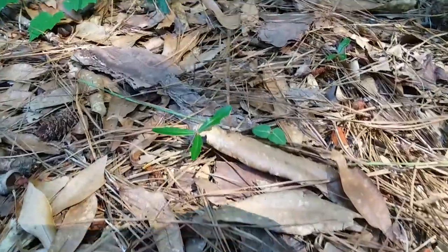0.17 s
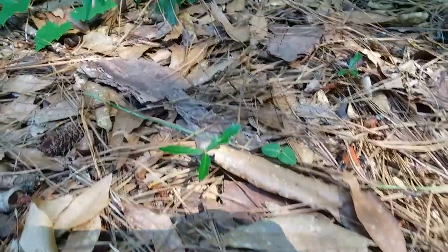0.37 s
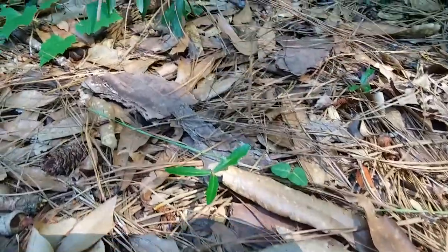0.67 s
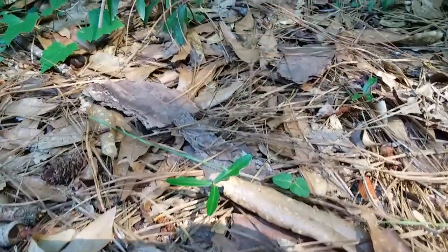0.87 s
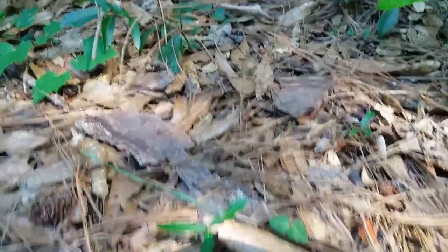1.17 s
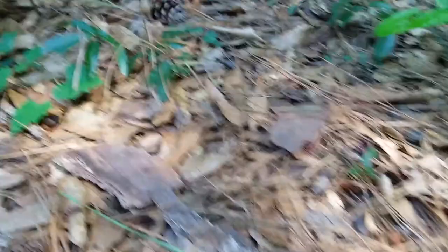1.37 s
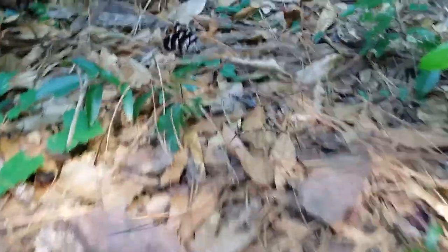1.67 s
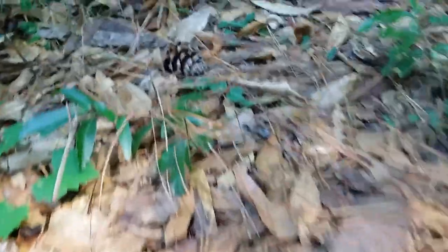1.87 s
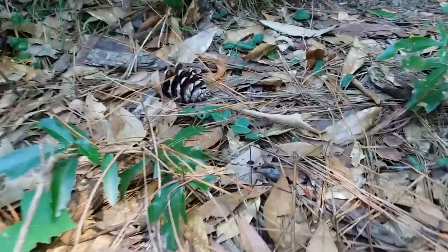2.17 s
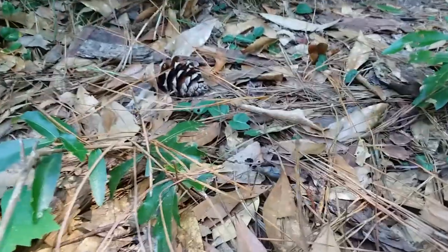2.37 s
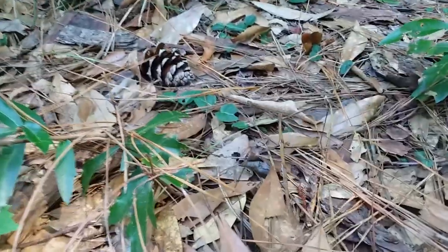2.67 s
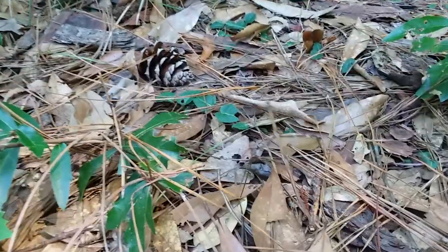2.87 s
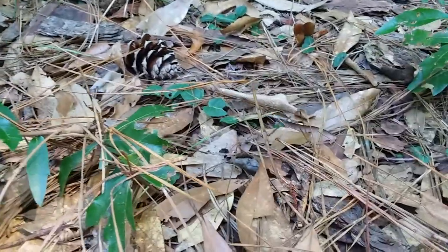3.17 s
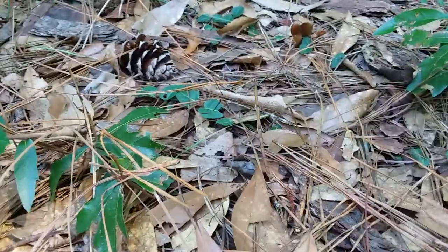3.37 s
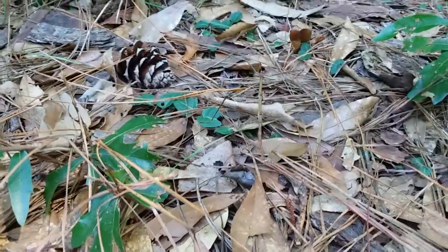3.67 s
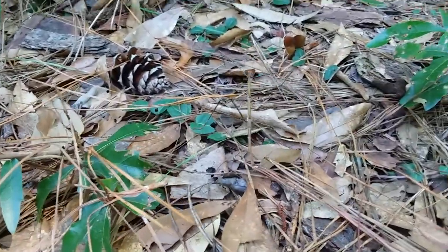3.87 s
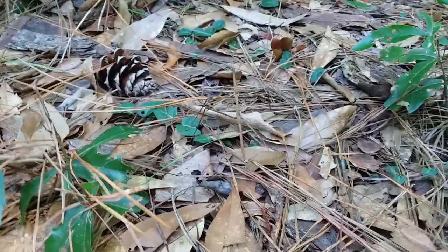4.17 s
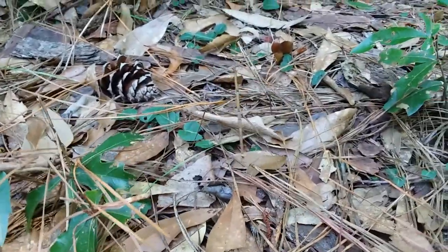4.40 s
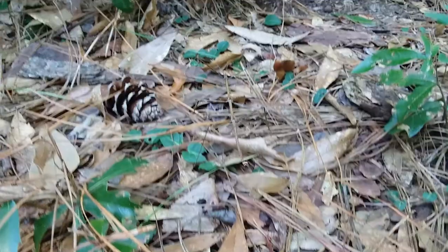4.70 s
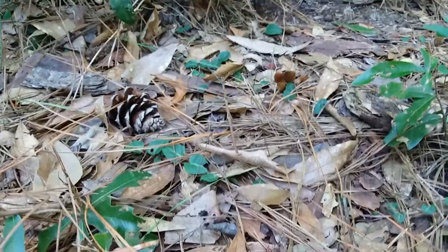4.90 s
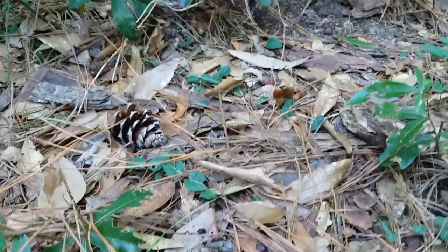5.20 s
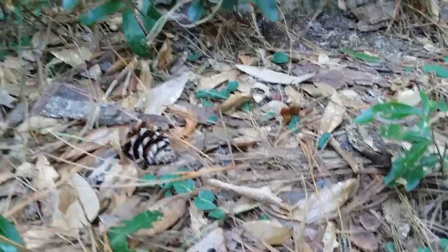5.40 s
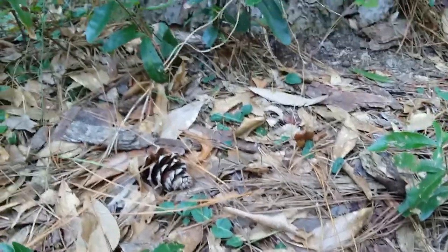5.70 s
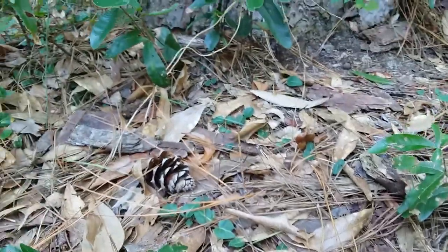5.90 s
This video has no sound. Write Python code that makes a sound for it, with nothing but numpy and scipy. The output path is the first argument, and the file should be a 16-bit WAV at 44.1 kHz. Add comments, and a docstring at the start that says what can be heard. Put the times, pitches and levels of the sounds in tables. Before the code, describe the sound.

A cicada buzzes in a pine wood, a knock bumps the microphone, twigs and dry leaves crack, then the song swells, slows and dies away.

```python
"""A cicada is already buzzing softly in a pine wood, over far insects and a low distant rumble.
A small bird chips once, the hand-held camera is bumped beside its left microphone, and twigs and dry leaves crack.
The song swells, its throb slows, and it dies away. It is built from overtones, rasping noise and short rings.
The backgrounds are shaped noise, the bird is a gliding tone, and the knocks and cracks are rings of struck bodies."""
import sys
import numpy as np
from scipy import signal
from scipy.fft import rfft, irfft
from scipy.io import wavfile

SR = 44100
rng = np.random.default_rng(int(sys.argv[2]) if len(sys.argv) > 2 else 0)


def unload_audio(sound):
    """Save the sound as a 16-bit wav file, at the path given as the first command line argument."""
    columns = np.transpose(np.atleast_2d(sound))
    # keep every value between -1 and 1, then stretch to whole-number steps
    steps = np.round(np.clip(columns, -1, 1) * 32767)
    wavfile.write(sys.argv[1], SR, steps.astype(np.int16))


N = 266628
T = np.arange(N) / SR  # time of each sample (s)
HZ = np.fft.rfftfreq(N, 1 / SR)  # pitch of each spectrum bin

RIGHT_LEAD_S = 1.75 / SR  # the wood's sound reaches the right microphone first
CYCLE_HZ, CYCLE_RISE_HZ_PER_S = 248.76, .603  # the tymbal cycle creeps up through the song
GROUND_SHARE = .66  # strength of the ground's echo against the direct sound
SMEAR_RAD = .7  # typical random phase shift that smears a pulse
# delay of the ground's echo, which changes as the camera moves: time_s, delay_s
GROUND_DELAY = [(0, .002073), (1.5, .0021), (1.75, .002122), (2.5, .00212), (4.7, .00216)]
# leaves scatter the treble, so it differs between the microphones: pitch_hz, share_0_to_1
SCATTER = [(8700, .2), (10400, .9)]


def amp(db):
    """Turns decibels into gain."""
    return 10 ** (np.asarray(db) / 20)


def unit(x):
    """Scales a sound to an rms of 1."""
    return x / np.sqrt(np.mean(abs(x) ** 2) + 1e-20)


def curve(rows):
    """Reads a table of times and values at every sample."""
    return np.interp(T, *np.transpose(rows))


def read(points, hz):
    """Reads a table of pitches and values, on a logarithmic pitch axis."""
    f, value = np.transpose(points)
    return np.interp(np.log(hz + 1), np.log(f + 1), value)


def pan(left_db):
    """Gives the two channels' gains for a left-minus-right level."""
    return amp([[left_db / 2], [-left_db / 2]])


def add(mix, s, sound):
    """Mixes a stereo sound in at time s."""
    part = mix[:, round(s * SR):][:, :sound.shape[1]]
    part += sound[:, :part.shape[1]]


def wander(rate_hz):
    """Slow random drift with an rms of 1."""
    return unit(irfft(rfft(rng.standard_normal(N)) * np.exp(-(HZ / rate_hz) ** 2), N))


def colour(x, spectrum):
    """Filters a sound by a spectrum table, to an rms of 1."""
    return unit(irfft(rfft(x) * amp(read(spectrum, HZ)), N))


def air(spectrum):
    """Noise from all around: alike at both microphones in the bass, different in the treble."""
    # left-right likeness: pitch_hz, likeness_0_to_1
    likeness = [(60, 0.87), (130, 0.95), (290, 0.72), (640, 0.64), (1400, 0), (4000, 0), (15000, 0)]
    a, b = rfft(rng.standard_normal((2, N)))
    same = np.clip(read(likeness, HZ), 0, 1)
    right = same * a + np.sqrt(1 - same ** 2) * b
    right = right * np.exp(2j * np.pi * HZ * RIGHT_LEAD_S)
    return unit(irfft(np.array([a, right]) * amp(read(spectrum, HZ)), N))


def strike(spectrum, tilt_db, slow=0., size=2048):
    """The ring of a body after one sharp blow, peak 1; in a bending shell the low notes arrive later."""
    hz = abs(np.fft.fftfreq(size, 1 / SR))
    log_gain = np.log(amp(read(spectrum, hz) + tilt_db * np.log2(hz / 1000 + 1 / 2)))
    # this phase puts the ring after the blow, never before it
    response = np.exp(np.conj(signal.hilbert(log_gain)) - 1j * abs(slow) * np.sqrt(hz / 1000))
    ring = irfft(response[:size // 2 + 1])[:size // 2]
    return ring / abs(ring).max()


def stroke(start, hold_s, db, fade_db_per_s, rise_s):
    """A loudness shape that rises up to its start, holds and fades."""
    rise = np.clip(1 + (T - start) / rise_s, 0, 1)
    return rise * amp(db - abs(fade_db_per_s) * np.maximum(T - start - hold_s, 0))


def trunks(x, t60, count=160):
    """Scattered echoes off the trees, different on each side, falling 60 dB in t60 seconds."""
    taps = np.zeros((2, SR // 2))
    at = rng.integers(0, SR // 2, (2, count))
    np.put_along_axis(taps, at, rng.choice([-1., 1.], (2, count)), 1)
    taps *= 1000 ** (-np.arange(SR // 2) / SR / t60)
    taps /= np.linalg.norm(taps, axis=1, keepdims=True)
    return signal.fftconvolve(x, taps, axes=1)[:, :N]


def background(rumble_db=-58, insects_db=-69, hum_hz=113.0, hum_db=-70):
    """Shaped noise for distant traffic and far insects, with a faint hum that wavers in pitch and level."""
    # spectra of the noises: pitch_hz, relative_db_per_hz
    rumble_spectrum = [(20, -61), (35, -31), (58, -1.5), (85, -3.5), (113, 1.5), (145, -5.5), (250, -10.5),
                       (430, -14.5), (700, -22.5), (1100, -24.5), (1900, -32.5), (4000, -27), (16000, -52)]
    insect_spectrum = [(1200, -11), (2300, -14), (3200, -18), (3900, -26), (5000, -0.5), (5700, -0.5),
                       (6300, 0), (8300, -2.5), (9600, -10.5), (11300, -1), (13000, -13), (16000, -20)]
    road_spectrum = [(200, -28), (500, -5.5), (780, 5.5), (1000, 1.5), (1350, -14.5), (2500, -20)]
    low_hiss_spectrum = [(1200, -20), (2200, 1), (3200, -0.5), (3800, -0.5), (4600, -17), (8000, -48)]
    # level of a soft low hiss, which sinks in the middle and rises a little at the end: time_s, level_db
    low_hiss_level = [(0, -73), (1.1, -70), (2.3, -75), (3.2, -81), (4.6, -82.5), (5.2, -78)]
    nearest_s, pass_s, nearest_db = 5.66, 0.55, -64  # a far vehicle draws near

    rumble = air(rumble_spectrum) * amp(rumble_db + .7 * wander(3.5)) * pan(0.95)
    hum_phase = 2 * np.pi * np.cumsum(hum_hz + 3 * wander(7.7)) / SR
    hum = unit(np.sin(hum_phase) * (1 + .5 * wander(9.2)))
    insects = air(insect_spectrum) * amp(insects_db + .5 * wander(22.0))
    low_hiss = air(low_hiss_spectrum) * amp(curve(low_hiss_level))
    vehicle = air(road_spectrum) * amp(nearest_db) / np.hypot(1, (T - nearest_s) / pass_s)
    return rumble + amp(hum_db) * hum + vehicle + insects + low_hiss


def far_trills(pulse_hz=45, pulse_depth=0.36, drift_db=2.0):
    """Single insects deep in the wood, each a narrow band of noise that pulses and drifts in level."""
    # the insects: pitch_hz, width_hz, average_level_db
    trills = [(5680, 200, -78), (6470, 110, -83), (7760, 220, -82), (8180, 200, -81.5), (11330, 250, -87)]
    out = np.zeros((2, N))
    for hz, width_hz, db in trills:
        ring = irfft(rfft(rng.standard_normal((2, N))) / (1 + (2 * (HZ - hz) / width_hz) ** 2), N)
        own_pulse_hz = pulse_hz * rng.uniform(.7, 1.3)
        pulses = 1 + pulse_depth * np.sin(2 * np.pi * own_pulse_hz * T)
        out += amp(db + drift_db * wander(2)) * unit(ring * pulses)
    return out


def footing(settle_s=0.01, size=4096):
    """A shoe presses the soft ground: a dull thud, then the needles settle as fading noise."""
    # the thuds: start_s, peak_db (before panning), treble_tilt_db_per_octave, left_minus_right_db
    thuds = [(3.864, -50, -7.5, -11), (4.12, -49, 4, 9)]
    # ring of the soil: pitch_hz, relative_db
    soil = [(80, -17), (400, 7), (900, -8), (2000, -16), (4000, -37), (16000, -60)]
    out = np.zeros((2, N))
    for s, db, tilt_db, left_db in thuds:
        push = 0.17 * rng.standard_normal((2, size)) * np.exp(-np.arange(size) / SR / settle_s)
        push[:, 0] = 3  # the first press is the strongest
        thud = signal.fftconvolve(push, strike(soil, tilt_db)[None], axes=1)
        add(out, s, amp(db) * thud / abs(thud).max() * pan(left_db))
    return out


def crackle(grains_per_s=5000, count=24, left_db=-1.5):
    """A foot shifts in the leaves: tiny breaks, each a few cycles at one of several pitches."""
    # the shifts: start_s, hold_s, level_db (before panning)
    rustles = [(0, 1.8, -73.5), (1.295, 0.056, -63.5), (1.478, 0.12, -57.5), (1.626, 0.14, -61),
               (1.96, 0.67, -69.5), (5.68, 0.072, -73)]
    rise_s, fade_db_per_s = 0.16, 78
    # tone of the leaves: pitch_hz, relative_db
    leaf_tone = [(200, 3.5), (700, 1.5), (1500, -2), (2400, -4.5), (4000, -7.5), (8000, -5), (16000, -14)]
    t, out = np.arange(200) / SR, np.zeros((2, N))
    for hz in np.geomspace(800, 15000, count):
        at = rng.integers(0, N, round(grains_per_s * N / SR / count))
        strength = amp(3 * np.minimum(rng.exponential(1, len(at)), 4))
        breaks = np.zeros((2, N))
        breaks[:, at] = strength * rng.uniform(.3, 1, (2, len(at)))
        grain = hz * np.sin(2 * np.pi * hz * t) * np.exp(-hz * t / 2)
        out += signal.oaconvolve(breaks, grain[None], axes=1)[:, :N]
    pressure = np.max([stroke(*row, fade_db_per_s, rise_s) for row in rustles], axis=0)
    return colour(out, leaf_tone) * pressure * pan(left_db)


def litter(splinter_s=0.0023, echo_db=-26, size=1024):
    """A twig rings briefly when it snaps; a dry leaf splinters in a few milliseconds of tiny breaks."""
    # the cracks: start_s, level_db (before panning), leaf_treble_tilt_db_per_octave, wood_share_0_to_1
    cracks = [(1.4305, -34.5, -3, 0.08), (1.459, -39, -4, 0.4), (1.471, -43, 0, 0.5),
              (1.4914, -26, 8, 0.52), (1.507, -38, 0, 0.65), (1.5255, -34, 5, 0.13), (1.533, -42, -10, 0.4),
              (1.547, -40, -6, 0.4), (1.5765, -29.5, -7.5, 0.1), (1.594, -25.5, 1.5, 0.13),
              (1.605, -41, -8, 0.3), (1.661, -36.5, -8.5, 0.24), (1.6864, -14, -5.5, 0.76),
              (1.752, -41, -1, 0.05), (1.816, -39, 6, 0.04), (2.036, -42, -6, 0.06), (2.142, -38, 2, 0),
              (2.339, -44, -8.5, 0.1), (2.663, -38, 3, 0.05), (3.123, -49, -3, 0.45),
              (5.3378, -29.5, -1.5, 0.08), (5.368, -39.5, 4, 0.13), (5.596, -46.5, 0, 0), (5.68, -45, 3, 0)]
    # rings of the two materials: pitch_hz, relative_db
    twig = [(100, -16), (700, -23), (1100, -6), (1520, 2), (1980, -10.5), (2330, 7.5), (2950, 2),
            (3900, -12.5), (5500, -25), (7000, -21), (8400, -21), (10500, -23), (13500, -21), (15000, -7.5),
            (16500, -23)]
    dry_leaf = [(300, -28), (1500, -16), (2400, -15), (3400, -3), (4400, -9), (5700, 3), (7200, -3),
                (8100, -1), (9500, -8), (11500, -1), (13500, -2), (16500, -4)]
    out = np.zeros((2, N))
    for s, db, tilt_db, wood in cracks:
        breaks = rng.standard_normal((3, size)) * np.exp(-np.arange(size) / SR / splinter_s)
        breaks[0, 0] = 7  # a sharp first break, shared by both sides
        both_sides = breaks[0] + 5.6 * breaks[1:]
        leaf = signal.fftconvolve(both_sides, strike(dry_leaf, tilt_db)[None], axes=1)[:, :size]
        wood = np.clip(wood, 0, 1)
        snap = wood * strike(twig, 0, slow=3.6) + (1 - wood) * leaf / abs(leaf).max()
        add(out, s, amp(db) * snap * pan(-2.8))
    return out + crackle() + amp(echo_db) * trunks(out, t60=0.53)


def handling(far_side_db=-19, slow=2.5):
    """A finger knocks the case, which rings, and slides across it as noise, beside the left microphone."""
    # the knocks: start_s, peak_db (left side), treble_tilt_db_per_octave
    bumps = [(1.1874, -6.5, 0), (1.2481, -14.5, 3), (1.254, -24.5, 3), (1.2566, -32, -9),
             (1.2593, -11.5, 3), (1.261, -18.5, 4), (1.266, -42, -4), (1.267, -18, 14)]
    # the slides: start_s, hold_s, level_db (left side), fade_db_per_s
    slides = [(1.193, .003, -44, 290), (1.257, .011, -32, 2100)]
    # ring of the case, and tone of a finger sliding on it: pitch_hz, relative_db
    case = [(40, -45), (120, -10), (250, 5.5), (480, 1.5), (800, -2.5), (1250, -7.5), (1750, -2.5),
            (2400, -19), (4200, -21.5), (5500, -26), (8000, -23), (10000, -40), (16000, -41)]
    scrape_tone = [(100, -40), (290, -9), (470, 8.5), (720, -3), (1000, -4), (2200, -3), (3100, -15),
                   (8000, -22.5), (16000, -35)]
    out = np.zeros((2, N))
    for s, db, tilt_db in bumps:
        near = strike(case, tilt_db, slow)
        far = strike(case, tilt_db - 6.5, 3 * slow)  # duller and more spread out
        add(out, s, amp(db) * np.array([near, amp(far_side_db) * far]))
    scrape = colour(rng.standard_normal((2, N)), scrape_tone)
    scrape = scrape * sum(stroke(*row, rise_s=0.013) for row in slides)
    return out + scrape * amp([[0], [far_side_db]])


def bird(echo_db=0):
    """One thin chip, a tone that falls quickly and levels off, and its echoes."""
    start_s, length_s, from_hz, to_hz, level_db = .936, .042, 8300, 7450, -56
    u = np.clip((T - start_s) / length_s, 0, 1)  # progress through the chip
    hz = to_hz + (from_hz - to_hz) * (1 - u) ** 2
    chip = np.sin(2 * np.pi * np.cumsum(hz) / SR) * np.sin(np.pi * u) * amp(level_db) * pan(0)
    return chip + amp(echo_db) * trunks(chip, t60=0.74)


def ground(x, share):
    """Adds the ground's echo, which cuts a sound into slowly shifting bands."""
    echo = np.array([np.interp(T - curve(GROUND_DELAY), T, side) for side in x])
    return (x + share * echo) / np.hypot(1, share)


def tymbal_lines(cycle, opening):
    """The overtones of the rib clicks; the ground's echo strengthens some and cancels others."""
    # the overtones: multiple_of_cycle, relative_db
    overtones = [(13, -22), (14, -26), (15, -9), (16, -15), (17, -10.5), (18, -12), (19, -6), (20, -10),
                 (21, -15), (22, -7), (23, -11), (24, -3), (25, -.5), (26, .5), (27, -6), (28, 1), (29, -5),
                 (30, .5), (31, -1.5), (32, 0), (33, -8), (34, -8.5), (35, -18), (36, -17)]
    # levels of the overtones above those: pitch_hz, relative_db
    skirt = [(9200, -30), (9800, -30), (10600, -16), (11300, -14.5), (12300, -18), (14000, -21),
             (16000, -26)]
    # the abdomen's resonance shifts up and down through the song and sinks as it ends:
    # time_s, centre_hz, boost_db
    abdomen = [(0, 6400, 2), (1.4, 6400, 2), (2.1, 6700, 2), (2.6, 7900, 2), (2.9, 6800, -1),
               (3.22, 6450, 3), (3.6, 6300, 2), (3.85, 7050, 1), (4.2, 7150, 2), (4.6, 7200, -2.5),
               (5, 6050, 5)]
    abdomen_width_hz = 400
    # extra level of the overtones below low_hz: time_s, level_db
    low_level = [(0, 1), (2.2, 2), (3.3, -2), (4.3, -3), (4.8, -8)]
    low_hz = 4100
    # the quiet opening lacks treble: pitch_hz, level_db
    opening_dull = [(8500, 0), (10500, -9)]

    echo_lag = 2 * np.pi * (CYCLE_HZ + CYCLE_RISE_HZ_PER_S * T.mean()) * curve(GROUND_DELAY)
    levels = [(k, amp(db)) for k, db in overtones]
    levels += [(k, amp(read(skirt, k * CYCLE_HZ))) for k in range(overtones[-1][0] + 1, 64)]
    times, *controls = np.transpose(abdomen)
    centre_hz, boost_db = (np.interp(T, times, c) for c in controls)
    low_db = curve(low_level)
    ribs, power = np.zeros((2, N), complex), np.zeros(N)
    for k, level in levels:
        hz = k * CYCLE_HZ
        ring_db = boost_db * np.exp(-((hz - centre_hz) / abdomen_width_hz) ** 2)
        # each overtone slowly swells and sinks at its own rate
        flutter_hz = .8 * rng.uniform(0.4, 1.96)
        ring_db += 1.2 * np.sin(2 * np.pi * (flutter_hz * T + rng.random()))
        ring_db += (hz < low_hz) * low_db
        ring_db += opening * read(opening_dull, hz)
        heard = level * amp(ring_db) * (1 + GROUND_SHARE * np.exp(-1j * k * echo_lag))
        # the two tymbals are equally loud but ring differently; paths of unequal length smear each pulse
        lag = np.pi / 2 * (k % 2) + SMEAR_RAD * rng.standard_normal()
        lag = lag + np.array([0, 2 * np.pi * hz * RIGHT_LEAD_S])
        lag[1] += 2 * read(SCATTER, hz) ** 2 * rng.standard_normal()
        ribs += np.exp(1j * lag)[:, None] * (heard * np.exp(1j * k * cycle))
        power += abs(heard) ** 2
    return ribs / np.sqrt(power)  # an even level throughout


def falling_rings(cycle, beat, cycle_hz, throb_hz):
    """Each rib click rings for under a millisecond; the clicks of a squeeze swell, fade and fall in pitch."""
    # the rings: from_hz, to_hz, ring_time_s, relative_db, share_left_between_throbs
    rings = [(7000, 4400, .0003, -8, .1), (8800, 7400, .0003, -16, .9), (12600, 10000, .00012, -14, .85)]
    # the body passes little of the rings' low end: pitch_hz, level_db
    ring_reach = [(3000, -30), (4100, -16), (4750, 0), (16000, 0)]
    # a squeeze starts this far before the throb's top and lasts this long (in throbs)
    squeeze_lead, squeeze_share = .36, .68
    out = np.zeros(N)
    for from_hz, to_hz, ring_s, db, rest in rings:
        train = np.zeros(N)
        for earlier in (0, 1):  # the last click and the one before it
            age = (cycle / np.pi % 1 + earlier) / (2 * cycle_hz)  # seconds since the click
            throbs = beat / (2 * np.pi) - throb_hz * age + squeeze_lead
            squeeze = np.minimum(throbs % 1 / squeeze_share, 1)
            hz = np.where(squeeze < 1, from_hz + (to_hz - from_hz) * squeeze, (from_hz + to_hz) / 2)
            strength = rest + (1 - rest) * np.sin(np.pi * squeeze)
            train += strength * age * np.exp(-age / ring_s) * np.sin(2 * np.pi * hz * age)
        out += amp(db) * unit(train)
    # paths of unequal length smear each click, a little differently for each microphone
    knots = np.arange(0, SR / 2, 420)  # a new random phase every 420 Hz
    shared, own = (np.interp(HZ, knots, row) for row in rng.standard_normal((2, len(knots))))
    right = 2 * np.pi * HZ * RIGHT_LEAD_S + 2 * read(SCATTER, HZ) * own
    lag = SMEAR_RAD * shared + np.array([0 * right, right])
    smeared = irfft(rfft(out) * amp(read(ring_reach, HZ)) * np.exp(1j * lag), N)
    return ground(smeared, .45)


def swell_bands(song):
    """Raises and lowers each band of the song along its own level curve."""
    # the bands: centre_hz, half_width_hz, level curve (time_s, level_db)
    bands = [(5040, 340, [(0, -7), (.3, -6), (.5, 0), (2.2, -1.5), (2.6, -1), (3.3, -1.5), (3.9, 1.5),
             (4.3, -2), (4.8, -3)]), (7080, 190, [(0, 0), (1, 0), (1.2, -1), (1.9, 0), (2.3, -3.5),
             (2.9, -4), (3.2, 2.5), (3.6, 0), (4.2, 2), (4.9, 0)]), (8360, 370, [(0, 4), (.3, 0.5),
             (1.8, 2), (2.1, 1), (2.9, 2.5), (3.6, -1.5), (4.6, 0)])]
    for centre_hz, width_hz, level in bands:
        band = irfft(rfft(song) * np.exp(-((HZ - centre_hz) / width_hz) ** 2), N)
        song = song + (amp(curve(level)) - 1) * band
    return song


def cicada(level_db=3.0, echo_db=-15, left_db=-4.0, start_left_db=1, rasp_rise_db=6):
    """Buckling tymbal ribs give a train of pulses, which the abdomen squeezes into throbs."""
    # the song's loudness, before level_db is added: time_s, level_db
    effort = [(0, -61.5), (1.14, -61.5), (1.8, -58.5), (2.02, -56.5), (2.18, -59), (2.4, -57),
              (2.95, -57.5), (3.22, -54.5), (3.65, -55.5), (3.73, -58.5), (4.02, -56), (4.22, -58.5),
              (4.54, -58), (4.9, -64), (5.2, -84)]
    stop_s, stop_db_per_s = 5.1, 60  # then the song dies away
    # the throb is fastest early on, then slows more and more: time_s, rate_hz (before a slight wander)
    throb_rate = [(0, 97.7), (.7, 98.7), (2.2, 96.8), (3.1, 92.7), (3.7, 88), (4.2, 82.8), (4.9, 75.7)]
    # the throb flattens as the song ends: time_s, share_of_depth
    throb_fade = [(4.45, 1), (5, .35)]
    # how strongly each pitch throbs: pitch_hz, relative_depth
    throb_reach = [(3700, .9), (4900, 1.1), (5600, 1), (6050, .6), (6650, .55), (7000, 1.05), (7300, .9),
                   (7700, .25), (16000, .15)]
    # spectrum of the rasp: pitch_hz, relative_db_per_hz
    rasp_spectrum = [(2500, -40), (3450, -26), (3780, -7), (4200, -16), (5000, -2), (5600, -2.5),
                     (6600, -3), (7300, -5), (7700, -3), (8300, -3), (8850, -7), (9800, -11), (11200, -2),
                     (13000, -9), (16000, -14)]
    start_rasp_db = -16  # against the overtones
    # the rings grow as the song builds: time_s, level_db
    ring_level = [(0, -12.5), (1.1, -6.5), (2, -1.5), (2.6, 2.5), (3.3, 1), (4.4, 2)]
    whistle_hz, whistle_width_hz, whistle_db = 8420, 35, 18  # one sharp resonance in the buzz

    cycle_hz = CYCLE_HZ + CYCLE_RISE_HZ_PER_S * T
    throb_hz = curve(throb_rate)
    cycle = 2 * np.pi * np.cumsum(cycle_hz + .15 * wander(30)) / SR
    beat = 2 * np.pi * np.cumsum(throb_hz + .5 * wander(12)) / SR
    # as the camera tilts up, from 1.2 to 1.9 s, the song gets raspier, whistles and moves right
    turned = np.interp(T, (1.2, 1.9), [0, 1])

    # the phase swings by .85 rad, so the ring is highest in pitch at the top of each throb
    buzz = (tymbal_lines(cycle, 1 - turned) * np.exp(1j * .85 * np.sin(beat))).real
    whistle = (amp(whistle_db) - 1) / (1 + 2j * (HZ - whistle_hz) / whistle_width_hz)
    buzz = unit(buzz + turned * irfft(rfft(buzz) * whistle, N))
    # the two tymbals click in turn, and no two clicks are alike
    clicks = 1 + .45 * np.cos(2 * cycle)
    rasp = ground(clicks * air(rasp_spectrum), GROUND_SHARE)
    song = buzz + rasp * amp(start_rasp_db + rasp_rise_db * turned)

    depth = np.interp(throb_hz, [91, 99], [.6, .41]) * curve(throb_fade)  # slower throbs are deeper
    song = song + depth * np.cos(beat) * irfft(rfft(song) * read(throb_reach, HZ), N)
    rings = falling_rings(cycle, beat, cycle_hz, throb_hz)
    song = unit(song + rings * amp(curve(ring_level)))
    loudness_db = level_db + curve(effort) - stop_db_per_s * np.maximum(T - stop_s, 0)
    song = swell_bands(song) * amp(loudness_db)
    side_db = start_left_db + (left_db - start_left_db) * turned
    return (song + amp(echo_db) * trunks(song, t60=1.0)) * amp([side_db / 2, -side_db / 2])


def scene():
    """Everything heard from just above the forest floor."""
    return background() + far_trills() + footing() + litter() + handling() + bird() + cicada()


def record(dry):
    """The recorder's band limit: it cuts the treble above 16200 Hz."""
    low_pass = signal.firwin(255, 16200, window=("kaiser", 8), fs=SR)
    return signal.oaconvolve(dry, low_pass[None], "same", axes=1)


dry = scene()
out = record(dry)
unload_audio(out)
```